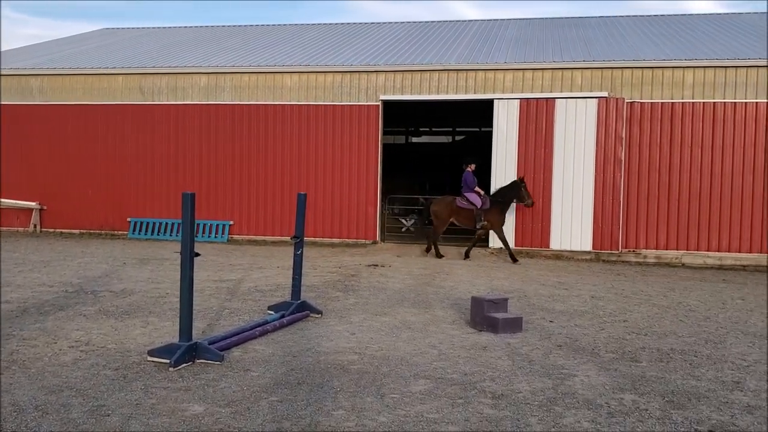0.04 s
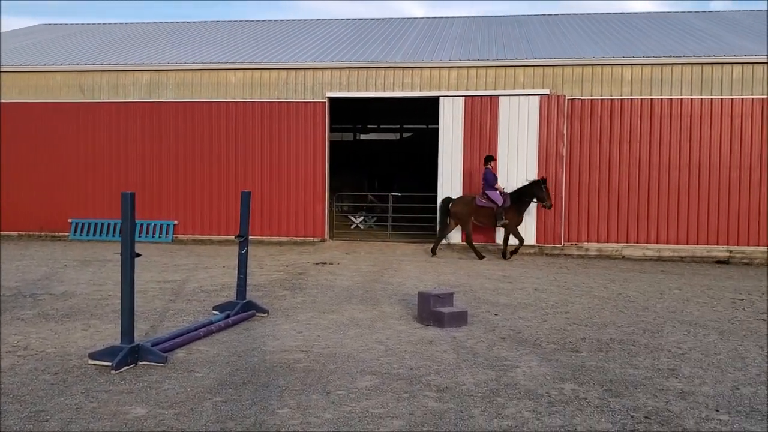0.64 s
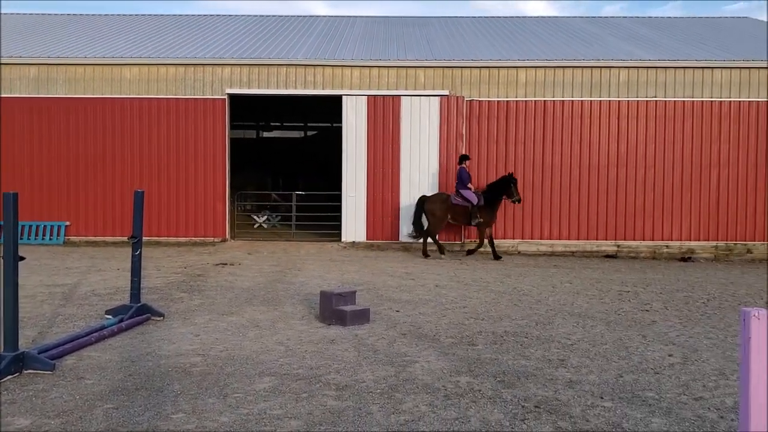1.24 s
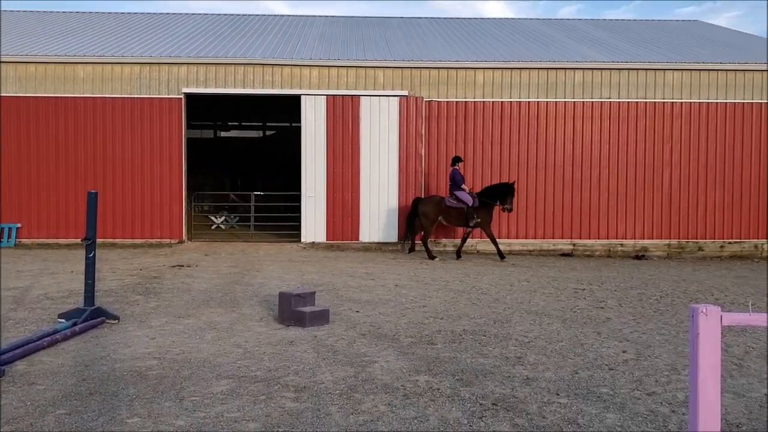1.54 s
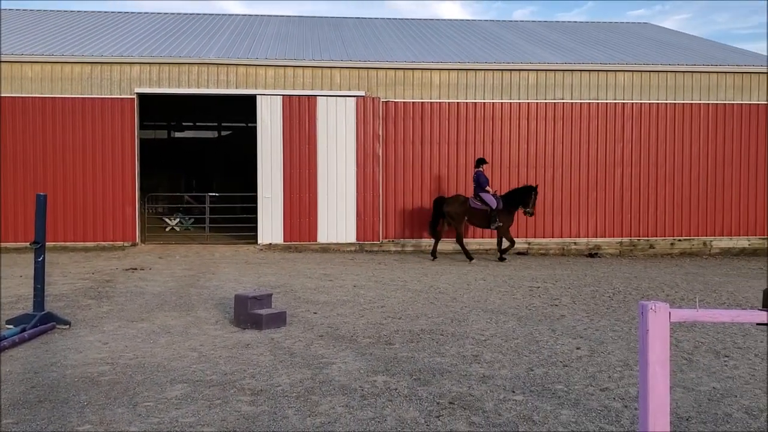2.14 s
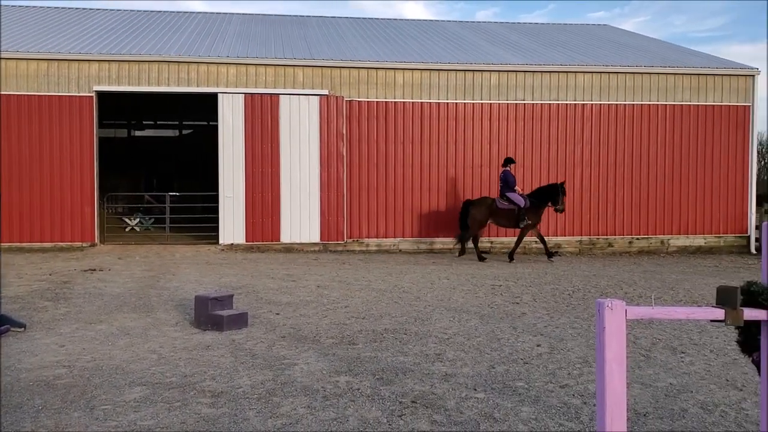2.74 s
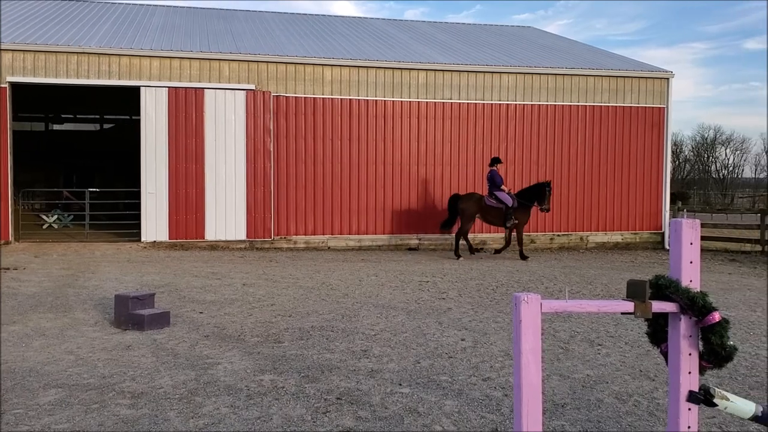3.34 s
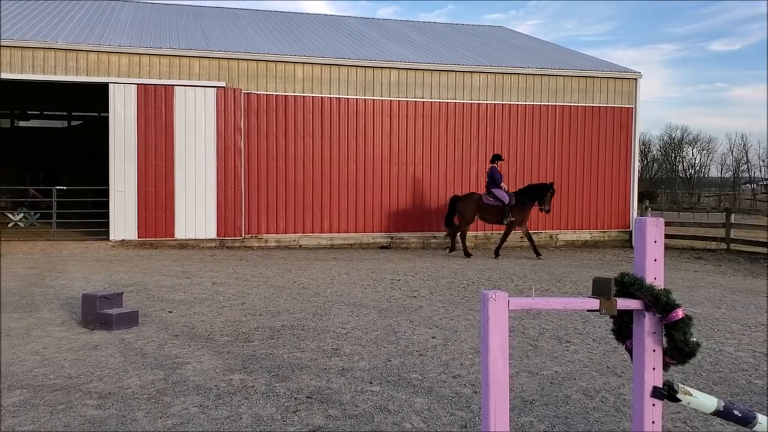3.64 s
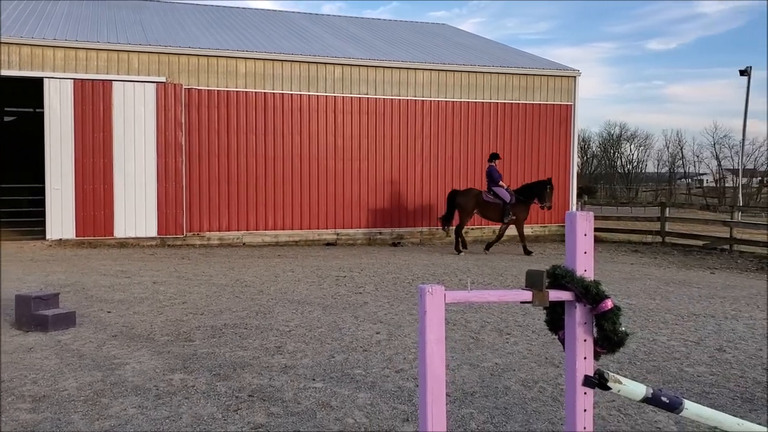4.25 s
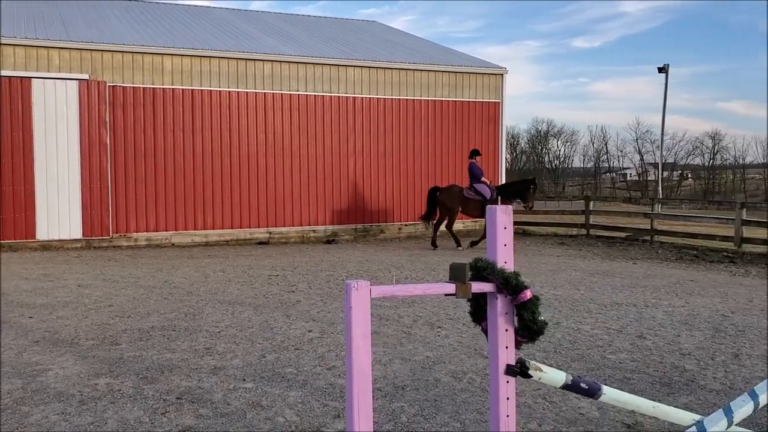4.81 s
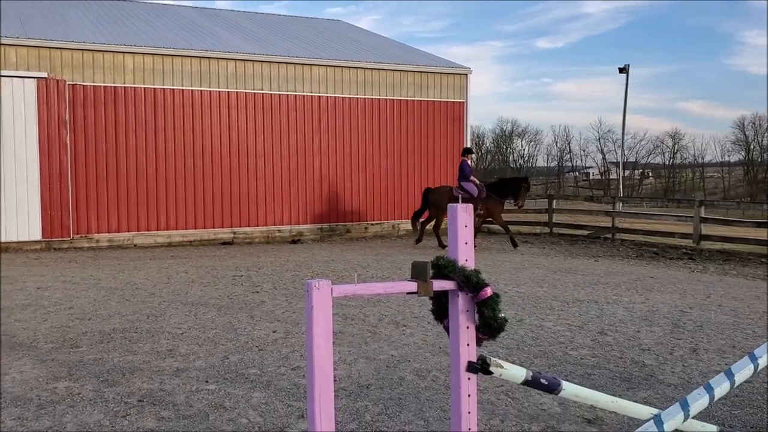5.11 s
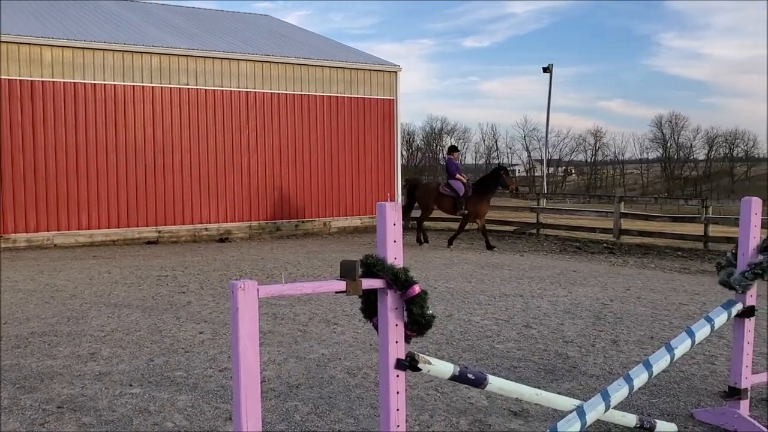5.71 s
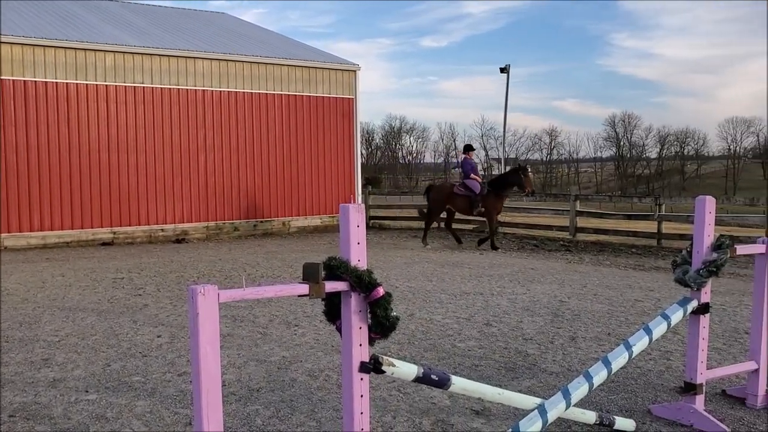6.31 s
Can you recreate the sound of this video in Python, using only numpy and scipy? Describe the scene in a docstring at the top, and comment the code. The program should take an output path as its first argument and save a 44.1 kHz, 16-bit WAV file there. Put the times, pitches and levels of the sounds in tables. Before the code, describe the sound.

A horse walks on gravel, its steady steps under gusty low wind rumble, light rustles and taps, and far-off bird whistles.

```python
"""A horse walking on gravel

A horse is walked along a barn: each hoof thuds and grinds stones together, with scuffs of grit between.
Gusts buffet the hand-held microphone, sleeves rustle and fingers bump its case.
Far off, one bird repeats a falling whistle, another gives a note and a buzzy trill, and an engine idles."""
import sys
import numpy as np
from scipy import signal
from scipy.fft import rfft, irfft, next_fast_len
from scipy.io import wavfile
from scipy.ndimage import uniform_filter1d

SR = 44100
rng = np.random.default_rng(int(sys.argv[2]) if len(sys.argv) > 2 else 0)


def materialize(psi):
    """Save the field psi as 16-bit PCM at rate SR to the path in sys.argv[1].

    A 1-D psi becomes a single channel; in a 2-D psi each row is a channel.
    """
    bounded = np.clip(np.atleast_2d(psi).T, -1, 1)
    quanta = np.round(bounded * 32767).astype(np.int16)
    wavfile.write(sys.argv[1], SR, quanta)


N = 289737
TIME = np.arange(N) / SR

# Below, "lean" is how much louder the left side is than the right. A spectrum sets only the tone colour.
# spectrum of the open-air hush: f/Hz, level/dB
AIR_SPECTRUM = [(30, 3), (48, 17), (120, 17), (250, 9), (480, -6.5), (700, -17.5), (1500, -22.5),
                (3000, -19), (4200, -9), (5500, -25.5), (7500, -29), (10000, -31.5), (15500, -28.5)]
# how the hush leans left: f/Hz, lean/dB
AIR_LEAN = [(100, -1.5), (400, 4.5), (1000, 6), (2200, 19.5), (4000, 17), (6000, 3), (9000, -3.5),
            (15000, -1)]
# tones of the idling engine: f/Hz, level/dB, lean/dB
ENGINE_TONES = [(79, -52, -0.5), (118.3, -54, 2.5), (174.8, -70.5, 0.5), (376.4, -76, 6.5),
                (496, -73.5, 11.5)]

# the first bird's whistles: t/s, lowest f/Hz, fall/Hz, relative level/dB
BIRD_WHISTLES = [(1.74, 3810, 230, -65), (2.11, 3860, 250, -68), (2.45, 3930, 250, -68),
                 (2.57, 4080, 110, -61), (2.79, 3980, 280, -64), (3.13, 3990, 310, -57),
                 (3.48, 4010, 340, -57), (3.82, 4000, 380, -61), (4.19, 4030, 280, -66),
                 (4.55, 3970, 440, -66), (4.91, 4000, 430, -65), (5.66, 3960, 360, -68),
                 (6.02, 3990, 320, -69), (6.4, 3970, 400, -67)]
# shape of one whistle: share of its length, share of the fall still to come, level/dB
WHISTLE_SHAPE = [(0, 1, -6), (.25, .5, -1), (.5, .16, 0), (.75, 0, 0), (.9, .07, -4), (1, .3, -14)]
# the second bird's opening note: t/s, f/Hz, level/dB
OPENING_NOTE = [(2.41, 1940, -76), (2.435, 1950, -51.5), (2.47, 1958, -52), (2.505, 1914, -54.5),
                (2.535, 2040, -62), (2.58, 2010, -79)]
# spectrum of its trill: f/Hz, level/dB
TRILL_SPECTRUM = [(1800, -37), (2300, -2), (2550, 1), (2850, -6), (3100, -6.5), (3450, -6), (3900, -12.5),
                  (4600, -43)]

# the breeze on the microphone: t/s, left level/dB, lean/dB
BREEZE = [(0, -42.5, 5), (.6, -39.5, -0.5), (.72, -32.5, 21), (1.2, -38.5, -3), (1.4, -26.5, 8.5),
          (1.76, -24.5, 2.5), (1.97, -29, 17.5), (2.35, -31.5, 7.5), (2.62, -36, 15), (3.1, -26.5, 4),
          (3.42, -32.5, 5.5), (3.66, -22.5, 2.5), (4.04, -37, 4), (4.28, -25.5, 14.5), (4.7, -32, 11.5),
          (4.92, -42.5, 2.5), (6.1, -53.5, -1.5), (6.5, -44.5, 2)]
# gusts: middle t/s, length/s, rumble/dB, flutter/dB, lean/dB
WIND_GUSTS = [(0.64, 0.059, -44, -73, -8), (0.768, 0.19, -36, -54, 0.5), (0.826, 0.073, -25.5, -43.5, 25),
              (0.901, 0.15, -26.5, -57, 21), (1.075, 0.15, -40.5, -74, -6), (1.366, 0.17, -28.5, -62, -3),
              (1.574, 0.21, -27.5, -58, 11), (1.717, 0.26, -28, -29, 18), (1.862, 0.12, -21, -41.5, 24),
              (1.936, 0.14, -36, -29.5, 25), (2.123, 0.16, -31.5, -30, 27), (2.165, 0.13, -32, -63, 3),
              (2.232, 0.077, -17.5, -64, 8.5), (2.457, 0.15, -31.5, -42.5, 12), (2.5, 0.18, -31, -45, 17),
              (2.64, 0.15, -26, -70, 9), (2.808, 0.25, -25.5, -40.5, 14), (3.293, 0.079, -21.5, -37, 10),
              (3.448, 0.12, -21.5, -56, 19), (3.764, 0.23, -22, -41, 12.5),
              (3.812, 0.055, -20.5, -33.5, 20), (3.927, 0.12, -34.5, -55, 0), (4.146, 0.1, -27.5, -56, 2.5),
              (4.344, 0.28, -26.5, -37, 26), (4.5, 0.12, -29, -36.5, 10.5), (5.107, 0.11, -32.5, -54, 13),
              (5.31, 0.13, -35, -47, 2.5), (5.437, 0.14, -41.5, -68, -2.5), (5.593, 0.17, -32, -68, 9),
              (6.304, 0.069, -32.5, -68, 16), (6.378, 0.091, -50, -82, -12.5), (6.517, 0.25, -34, -67, 6.5)]
# single swirls of air that slap the left side: t/s, level/dB, f/Hz
WIND_SLAPS = [(1.7275, -2.4, 150), (2.231, -15, 100), (3.666, -17, 90), (3.732, -15, 85), (3.800, -17, 95)]
# spectrum of the rumble of slow swirls: f/Hz, level/dB
RUMBLE_SPECTRUM = [(10, -35.5), (24, -12.5), (38, -1), (47, 6), (70, 7), (100, 0), (150, -11), (220, -21.5),
                   (320, -39), (500, -43), (1000, -69.5), (2000, -80.5)]
# spectrum of the wind's flutter: f/Hz, level/dB
FLUTTER_SPECTRUM = [(60, -31), (130, -3.5), (205, 3), (320, -22), (450, -29), (700, -51), (1500, -59),
                    (3000, -78.5)]

# how much the case shields the right side from a sound ahead: f/Hz, loss/dB
CASE_SHADE = [(200, -2.5), (550, 1.5), (1300, 11), (2400, 14), (4400, 10), (8000, -1.5)]
# strokes of rubbing cloth: middle t/s, length/s, level/dB, extra lean/dB
SLEEVE_STROKES = [(0, 0.11, -60.5, 1), (0.164, 0.27, -59.5, 2), (0.946, 0.33, -57, 5),
                  (1.18, 0.21, -50, -2), (1.332, 0.14, -50.5, -3), (1.456, 0.21, -51, -3.5),
                  (1.662, 0.28, -54.5, 1.5), (2.48, 0.33, -58.5, -1), (3.36, 0.28, -58, 0.5),
                  (3.918, .16, -62, 5.5), (4.227, 0.19, -48.5, 3), (4.367, .12, -58.5, 6),
                  (5.152, 0.65, -62.5, 4), (5.445, 0.38, -53.5, -0.5), (5.32, 0.17, -56.5, 8),
                  (5.72, 0.51, -57, -1)]
# spectrum of the cloth: f/Hz, level/dB
CLOTH_SPECTRUM = [(200, 5), (450, 0.5), (850, -2), (1250, 1), (1800, -4), (2700, -7), (4200, -12.5),
                  (6000, -27.5), (9000, -38), (15000, -42)]
# spectrum of one fast, sizzling stroke: f/Hz, level/dB
SIZZLE_SPECTRUM = [(2500, -12), (5000, 6), (7000, 2), (9000, -9), (15000, -8)]
# short hollow rasps: t/s, length/s, starting f/Hz, level/dB
RASP_SLIDES = [(0.088, .11, 1170, -63.5), (0.839, 0.085, 2310, -62), (1.26, 0.098, 869, -49.5),
               (1.56, 0.1, 1062, -57.5), (2.619, 0.041, 1870, -59.5), (3.306, 0.07, 1100, -57.5),
               (3.936, 0.056, 2120, -62.5), (4.124, 0.055, 2480, -61.5), (4.18, 0.065, 1100, -48.5),
               (4.201, 0.034, 1614, -52), (4.242, 0.062, 1163, -52.5), (6.32, 0.33, 1697, -69.5)]
# sharp taps on the case, and a sharp stone click underfoot near 6.29 s: t/s, level/dB, f/Hz, lean/dB
SHARP_TAPS = [(.5345, -30.5, 2020, 14), (1.068, -43.5, 6070, -1), (1.0798, -46, 850, 12),
              (1.186, -40, 2600, 6), (1.2003, -32, 2320, 3), (1.2007, -39.5, 756, 6),
              (1.327, -43, 1200, 11), (1.3765, -44.5, 1120, 5), (1.386, -41, 1090, 5),
              (1.455, -47, 1900, 9), (1.498, -41.5, 690, 7), (2.3743, -45, 1160, 9),
              (2.394, -48, 1190, 12), (2.439, -40.5, 940, 8), (3.3148, -41.5, 850, 11),
              (4.23, -39, 1820, 8), (4.895, -39.5, 1340, 14), (5.2294, -45.5, 1100, 8),
              (5.268, -42.5, 470, 6), (5.329, -44.5, 3980, 15), (5.3626, -38, 3300, 26),
              (5.3627, -38, 1110, 22), (5.5171, -39.5, 860, 3), (5.643, -34, 946, 6),
              (5.6435, -43.5, 2000, 9), (5.689, -44.5, 885, 2), (5.759, -38, 1070, 6),
              (5.766, -41, 955, 4), (6.2907, -33.5, 4000, 10), (6.2909, -33.5, 9600, 1),
              (6.5127, -46, 476, 5)]
# dull knocks on its left side: t/s, peak level/dB
CASE_KNOCKS = [(0.514, -36.5), (4.766, -50), (4.8144, -42.5), (4.855, -36), (4.891, -38), (4.914, -37),
               (4.952, -47), (5.056, -38.5), (5.091, -45), (5.2293, -38), (5.353, -39.5), (5.363, -35),
               (5.722, -39.5)]

# hooves landing on gravel: t/s, crunch level/dB
HOOF_STEPS = [(.16, -61), (.362, -55), (.735, -53.5), (.91, -52), (1.132, -51), (1.487, -47.5),
              (1.914, -52.5), (2.251, -42.5), (2.696, -48.5), (3.126, -44.5), (3.574, -52), (4.026, -49.5),
              (4.528, -52), (4.999, -46.5), (5.524, -48), (5.999, -52.5)]
# lighter scuffs between them: t/s, crunch level/dB
HOOF_SCUFFS = [(.547, -54), (.585, -61.5), (.868, -56), (1.684, -53.5), (2.094, -53.5), (2.218, -54.5),
               (2.475, -58), (2.889, -56), (2.924, -56), (3.304, -58.5), (3.768, -62.5), (3.87, -62.5),
               (4.765, -64), (4.868, -58), (4.888, -60), (5.8, -61), (6.228, -59.5), (6.287, -51.5),
               (6.5, -54.5)]
# sand kicked up: t/s, level/dB
SAND_SPRAYS = [(.283, -81), (1.14, -72), (2.218, -66.5), (2.265, -61.5), (3.13, -66), (4.42, -76),
               (5.55, -87), (6.287, -57)]
# spectrum of grinding gravel: f/Hz, level/dB
GRAVEL_SPECTRUM = [(150, -22.5), (400, 5.5), (700, -4), (1300, -4.5), (2400, 0), (4000, -5), (5000, -10),
                   (6000, -30), (8000, -35.5)]
# spectrum of fine sand: f/Hz, level/dB
SAND_SPECTRUM = [(3500, -17.5), (5200, 8), (6500, 5), (7700, 1), (9200, 9.5), (11000, -1), (12500, 3.5),
                 (15500, -5)]
# spectrum of the ground's thud: f/Hz, level/dB
THUD_SPECTRUM = [(30, -23.5), (80, 5.0), (150, -8), (300, -9.5), (700, -22.5), (2000, -92.0)]


def from_db(db):
    """Turn decibels into a factor to multiply a sound by."""
    return 10 ** (np.asarray(db) / 20)


def rms_one(x):
    """Scale a sound so that its average strength (rms) is 1."""
    return x / np.sqrt(np.mean(x ** 2, axis=-1, keepdims=True) + 1e-20)


def evened(x, size=SR // 14):
    """Hold a noise's strength near 1 over stretches of `size` samples."""
    return x / np.sqrt(uniform_filter1d(x ** 2, size, axis=-1) + 1e-12)


def in_time(rows, t=TIME):
    """Join a table's points with straight lines, one curve for each column after the first."""
    s, *columns = np.transpose(rows)
    return [np.interp(t, s, c) for c in columns]


def swell(middle_s, length_s, t=TIME):
    """A smooth rise and fall of height 1."""
    return np.exp(-np.pi * 2 * ((t - middle_s) / length_s) ** 2)


def drift(rate_hz):
    """A random wobble of typical size 1; a higher rate wobbles faster."""
    hop, warm_up = 40, 2000
    r = np.exp(-2 * np.pi * hop * rate_hz / SR)
    slow = signal.lfilter([1], [1, -2 * r, r * r], rng.standard_normal(N // hop + warm_up + 2))[warm_up:]
    return np.interp(np.arange(N) / hop, np.arange(len(slow)), rms_one(slow))


def colour(x, spectrum):
    """Turn each frequency up or down as the spectrum says."""
    size = next_fast_len(N)
    hz, db = np.transpose(spectrum)
    bins_hz = np.maximum(np.arange(size // 2 + 1) * SR / size, 1)
    gain = from_db(np.interp(np.log(bins_hz), np.log(hz), db))
    return irfft(rfft(x, size) * gain, size)[..., :N]


def stereo(near, scattered, likeness, lead=3):
    """Sound reaches the right side `lead` samples early, mixed with scattered sound."""
    right = np.sqrt(likeness) * np.roll(near, -lead) + np.sqrt(1 - likeness) * scattered
    return np.array([near, right])


def lean(pair, lean_db):
    """Lean a sound to the left by turning the right side down."""
    return np.array([pair[0], pair[1] * from_db(-lean_db)])


def shaded(pair, losses):
    """Turn the right side down by a different amount at each frequency."""
    return np.array([pair[0], colour(pair[1], [(hz, -db) for hz, db in losses])])


def noise(spectrum, likeness):
    """Smooth stereo noise of strength 1."""
    return rms_one(colour(stereo(*rng.standard_normal((2, N)), likeness), spectrum))


def grains(spectrum, per_s, spread_db, likeness, lead=3):
    """A stereo stream of tiny random impacts of uneven size, with strength 1."""
    boost_db = spread_db * np.minimum(rng.exponential(1, (2, N)), 4)
    sizes = from_db(boost_db) * rng.standard_normal((2, N))
    clicks = sizes * (rng.random((2, N)) < per_s / SR)
    return rms_one(colour(stereo(*clicks, likeness, lead), spectrum))


def near_bounces(pair, bounce_db):
    """Quick, shifting bounces off hand, body and ground make the tone patchy; strength 1."""
    out, sample = pair.copy(), np.arange(N)
    for side in range(2):
        for k in range(3):
            lag_s = .0011 * 1.8 ** k * (1 + .12 * drift(2))
            out[side] += from_db(bounce_db) * np.interp(sample - lag_s * SR, sample, pair[side])
    return rms_one(out)


def barn_echoes(pair, echo_db, delay_s):
    """Add six weak, dull echoes off the barn and fences to each side."""
    dull = signal.sosfilt(signal.butter(1, 4500, fs=SR, output="sos"), pair + 1e-18)
    out = pair.copy()
    for side in range(2):
        for lag in (delay_s * SR * rng.uniform(.5, 2.5, 6)).astype(int):
            out[side, lag:] += from_db(echo_db) * dull[side, :N - lag]
    return out


def open_air(level_db=-56.5):
    """The steady hush of the outdoors."""
    return shaded(from_db(level_db) * noise(AIR_SPECTRUM, likeness=.11), AIR_LEAN)


def engine(wander=.0127, waver_db=2.0):
    """A far engine hums; its tones rise and fall together as its speed wanders."""
    out = np.zeros((2, N))
    engine_time = np.cumsum(1 + wander * drift(3.83)) / SR
    for hz, level_db, lean_db in ENGINE_TONES:
        height = np.sqrt(2) * from_db(level_db + waver_db * drift(33))
        tone = height * np.sin(2 * np.pi * (hz * engine_time + rng.random()))
        out += lean([tone, tone], lean_db)
    return out


def whistling_bird(length_s=.16, gain_db=-1.5, waver_db=2.0):
    """Almost pure whistles slide down in pitch and waver on their way through the air."""
    song = np.zeros(N)
    for s, hz, fall_hz, level_db in BIRD_WHISTLES:
        span = slice(int(s * SR), int((s + length_s) * SR))
        share = (TIME[span] - s) / length_s
        height, shape_db = in_time(WHISTLE_SHAPE, share)
        fade = np.clip(20 * np.minimum(share, 1 - share), 0, 1)
        phase = 2 * np.pi * np.cumsum(hz + fall_hz * height) / SR
        song[span] += from_db(level_db + shape_db) * fade * np.sin(phase)
    song *= from_db(gain_db + waver_db * drift(60))
    return lean(stereo(song, 0, likeness=.96), 7.0)


def trilling_bird(peak_s=2.59, release_s=3.11, peak_db=-57, pulse_hz=75):
    """A rough held note breaks into a buzzy trill of fast-pulsing noise."""
    note_hz, note_db = in_time(OPENING_NOTE)
    roughness = 1 + .4 * drift(200)
    phase = 2 * np.pi * np.cumsum(note_hz * (1 + .012 * drift(120))) / SR
    note = from_db(note_db) * roughness * np.sin(phase)
    note *= (TIME > OPENING_NOTE[0][0]) & (TIME < OPENING_NOTE[-1][0])
    rise, sag, release = 257, 16.5, 74.5  # dB per second
    age = TIME - peak_s
    trill_db = peak_db + np.minimum(rise * age, -sag * age) - release * np.maximum(TIME - release_s, 0)
    pulsing = 1 + .15 * np.sin(2 * np.pi * pulse_hz * TIME)
    trill = from_db(trill_db) * pulsing * noise(TRILL_SPECTRUM, likeness=.62)
    return lean(trill + note, 18.0)


def wind(stiff_breeze_db=-25.5, stiff_flutter_db=-45.5, flutter_growth=2.4, right_flutter_db=1.5):
    """Air swirls over each side of the microphone: a rumble, and a lumpy flutter as it blows harder."""
    left_db, lean_db = in_time(BREEZE)
    breeze_db = np.array([left_db, left_db - lean_db])
    rumble = from_db(breeze_db)
    flutter = from_db(stiff_flutter_db + flutter_growth * (breeze_db - stiff_breeze_db))
    flutter = lean(flutter, -right_flutter_db)
    for s, length, rumble_db, flutter_db, lean_db in WIND_GUSTS:
        span = slice(max(int((s - length) * SR), 0), int((s + length) * SR))
        gust = lean([swell(s, length, TIME[span])] * 2, lean_db)
        rumble[:, span] = np.hypot(rumble[:, span], from_db(rumble_db) * gust)
        flutter[:, span] = np.hypot(flutter[:, span], from_db(flutter_db) * lean(gust, -right_flutter_db))
    out = rumble * evened(noise(RUMBLE_SPECTRUM, likeness=.12))
    lumpy = noise(FLUTTER_SPECTRUM, likeness=0) * from_db(6.0 * drift(90))
    out += flutter * evened(lumpy)
    for s, level_db, hz in WIND_SLAPS:
        # a push of air with suction before and after it
        offset = (np.pi * hz * (TIME - s)) ** 2
        out[0] += from_db(level_db) * (1 - offset) / (1 + offset / 2) ** 3
    return signal.sosfilt(signal.butter(2, 30, "high", fs=SR, output="sos"), out)


def sleeves(rubbing_db=-69.5, sizzle_db=-73):
    """Cloth rubs faintly all the time and swells with each stroke; one is fast enough to sizzle."""
    power = np.full((2, N), from_db(rubbing_db)) ** 2
    for s, length, level_db, lean_db in SLEEVE_STROKES:
        stroke = from_db(level_db) * swell(s, length)
        power += lean([stroke, stroke], lean_db) ** 2
    fibres = grains(CLOTH_SPECTRUM, per_s=3000, spread_db=3.2, likeness=.7)
    fibres = shaded(near_bounces(fibres, bounce_db=-10.0), CASE_SHADE)
    sizzle = from_db(sizzle_db) * swell(middle_s=5.42, length_s=.28) * noise(SIZZLE_SPECTRUM, likeness=.25)
    return np.sqrt(power) * fibres + lean(sizzle, 14.0)


def rasps(width_hz=420, climb=.15):
    """A short slide makes rubbing noise ring in a narrow band that climbs in pitch."""
    out = np.zeros(N)
    smoothing = signal.butter(2, width_hz / 2, fs=SR, output="sos")
    cosine, sine = rms_one(signal.sosfilt(smoothing, rng.standard_normal((2, N))))
    for s, length, hz, level_db in RASP_SLIDES:
        span = slice(int(s * SR), int((s + length) * SR))
        share = np.clip((TIME[span] - s) / length, 0, 1)
        phase = 2 * np.pi * np.cumsum(hz * (1 + climb * share)) / SR
        band = cosine[span] * np.cos(phase) + sine[span] * np.sin(phase)
        out[span] += from_db(level_db) * np.sin(np.pi * share) * band
    return lean(stereo(out, 0, likeness=.76), 6.5)


def taps(rise_cycles=1.06, crack_db=-11, crack_ratio=2.07, rattle_db=-32.0, rattle_s=.014):
    """A finger swings the case, or a stone clicks, for about two cycles, with a brighter crack and a brief
    rattle."""
    out, t = np.zeros((2, N)), TIME[:SR // 20]
    for s, level_db, hz, lean_db in SHARP_TAPS:
        age = t * hz / rise_cycles
        bump = age * np.exp(1 - age)
        swing = bump ** 2 * np.sin(2 * np.pi * hz * t)
        crack = bump ** 4 * np.sin(2 * np.pi * min(hz * crack_ratio, SR / 3) * t)
        band = signal.butter(1, [hz * .9, min(hz * 2.5, SR / 3)], "band", fs=SR, output="sos")
        hiss = rms_one(signal.sosfilt(band, rng.standard_normal((2, len(t)))))
        rattle = hiss * np.minimum(age, 1) * np.exp(-t / rattle_s)
        touch = stereo(swing + from_db(crack_db) * crack, 0, likeness=.95) + from_db(rattle_db) * rattle
        at = int(s * SR)
        out[:, at:at + len(t)] += lean(from_db(level_db) * touch, lean_db)
    return out


def knocks(ring_hz=380, width_hz=126, softness_hz=680):
    """A soft touch pushes the case in; it springs back and quickly settles."""
    out, t = np.zeros(N), TIME[:SR // 20]
    ring = np.exp(-np.pi * width_hz * t) * np.cos(2 * np.pi * ring_hz * t)
    push = signal.sosfilt(signal.butter(4, softness_hz, fs=SR, output="sos"), ring)
    for s, peak_db in CASE_KNOCKS:
        at = int(s * SR)
        out[at:at + len(t)] -= from_db(peak_db) * push / np.abs(push).max()
    return lean(stereo(out, 0, likeness=.8), 23)


def pebbles(per_s, low_hz, high_hz, ring_cycles, count=18):
    """Single stones clink at random, each at a pitch of its own; strength 1."""
    out = np.zeros(N)
    for hz in np.geomspace(low_hz, high_hz, count):
        hits = rng.standard_normal(N) * (rng.random(N) < per_s / count / SR)
        decay = 1000. ** (-hz / ring_cycles / SR)  # 60 dB down after ring_cycles
        turn = 2 * np.pi * hz / SR
        out += signal.lfilter([0, np.sin(turn)], [1, -2 * decay * np.cos(turn), decay ** 2], hits + 1e-18)
    return rms_one(stereo(out, 0, likeness=1))


def contact_power(rows, rise_s, decay_s, first_touch):
    """Each contact starts at a share of its full force, builds up, then dies away."""
    power = np.zeros(N)
    for s, level_db in rows:
        span = slice(int(s * SR), int(s * SR) + SR // 2)
        age = TIME[span] - s
        pressing = np.clip(first_touch + (1 - first_touch) * age / rise_s, 0, 1)
        settling = np.exp(-np.maximum(age - rise_s, 0) / decay_s)
        power[span] += (from_db(level_db) * pressing * settling) ** 2
    return power


def hooves(thud_db=2.0, clink_db=-5.5, firm_step_db=-50.5, firm_sand_db=-74.5, sand_growth=.92):
    """Under a hoof's weight, stones grind and clink in spurts, sand hisses and the ground thuds."""
    power = contact_power(HOOF_STEPS, rise_s=.027, decay_s=.028, first_touch=.3)
    power += contact_power(HOOF_SCUFFS, rise_s=.009, decay_s=.055, first_touch=.71)
    # firmer steps stir more sand
    sand_power = from_db(firm_sand_db) ** 2 * (power / from_db(firm_step_db) ** 2) ** sand_growth
    sand_power += contact_power(SAND_SPRAYS, rise_s=.0042, decay_s=.031, first_touch=.71)
    spurts = from_db(2.2 * drift(220))
    grinding = grains(GRAVEL_SPECTRUM, per_s=2800, spread_db=3.0, likeness=.6)
    clinks = from_db(clink_db) * pebbles(per_s=900, low_hz=1129, high_hz=4330, ring_cycles=32)
    stones = shaded(near_bounces(spurts * (grinding + clinks), bounce_db=-8.0), CASE_SHADE)
    sand = lean(spurts * grains(SAND_SPECTRUM, per_s=9000, spread_db=2.0, likeness=.15, lead=2), -4.0)
    thud = from_db(thud_db) * lean(noise(THUD_SPECTRUM, likeness=.98), 3.5)
    return np.sqrt(power) * (stones + thud) + np.sqrt(sand_power) * sand


def scene():
    """Add up all the sources; the birds and the hooves echo off the barn."""
    birds = barn_echoes(whistling_bird() + trilling_bird(), echo_db=-12.0, delay_s=.025)
    horse = barn_echoes(hooves(), echo_db=-24.5, delay_s=.093)
    handling = sleeves() + rasps() + taps() + knocks()
    return open_air() + engine() + birds + wind() + handling + horse


def record(dry, cutoff_hz=15800):
    """Cut off the highest treble steeply."""
    return signal.sosfilt(signal.ellip(10, .1, 80, cutoff_hz, fs=SR, output="sos"), dry)


dry = scene()
out = record(dry)
materialize(out)
```